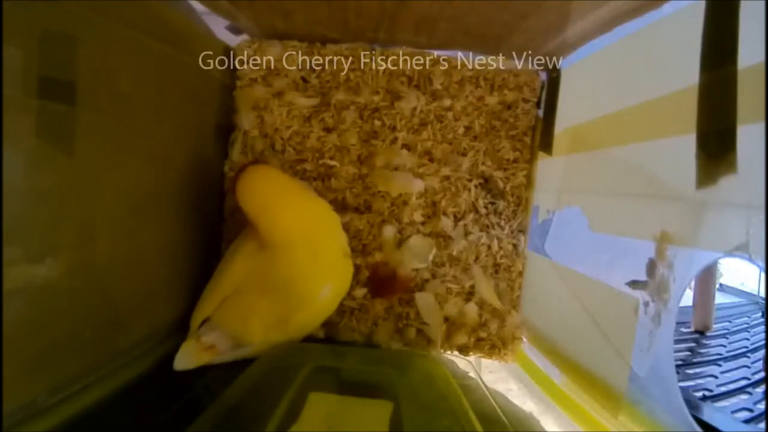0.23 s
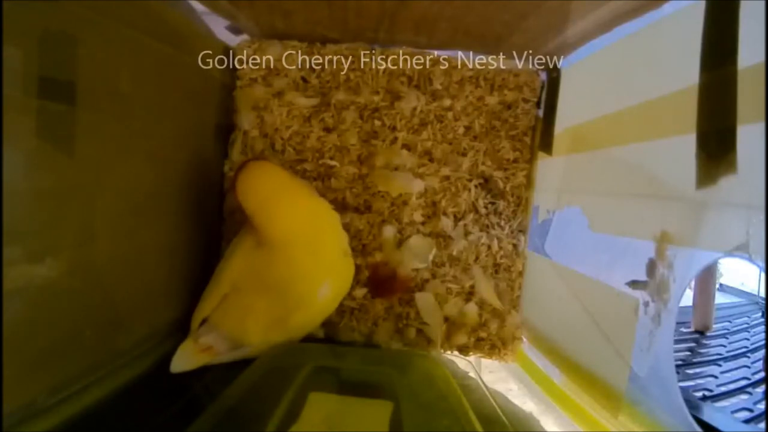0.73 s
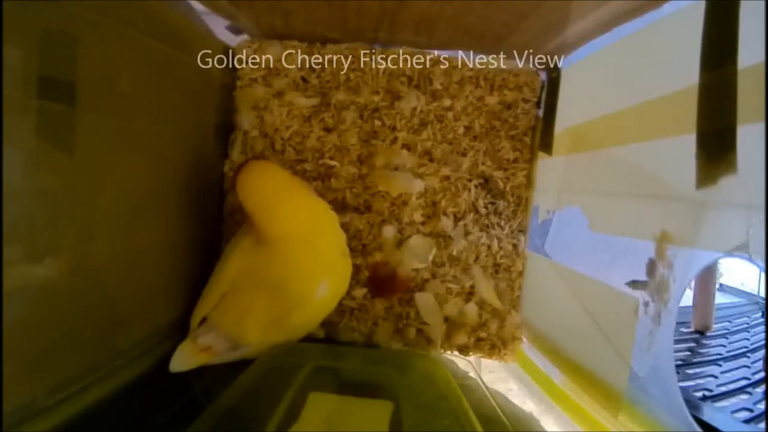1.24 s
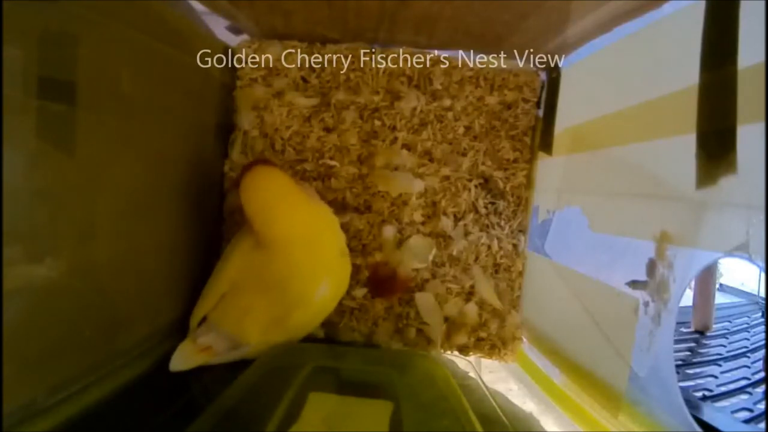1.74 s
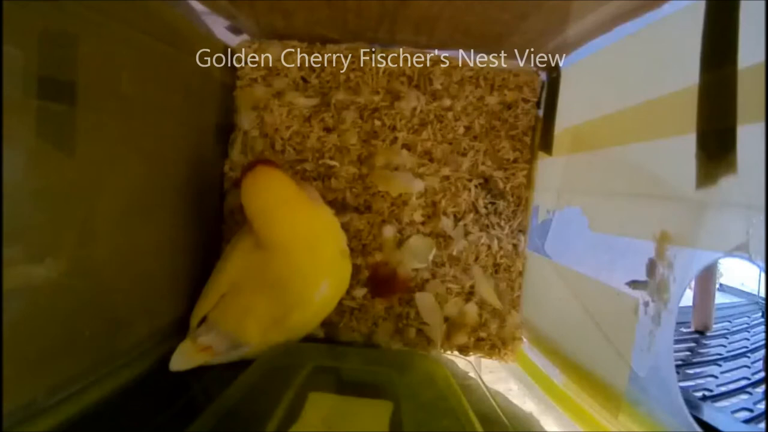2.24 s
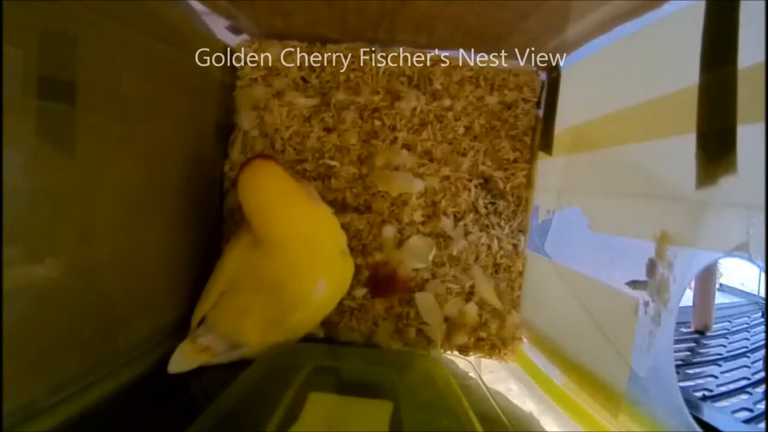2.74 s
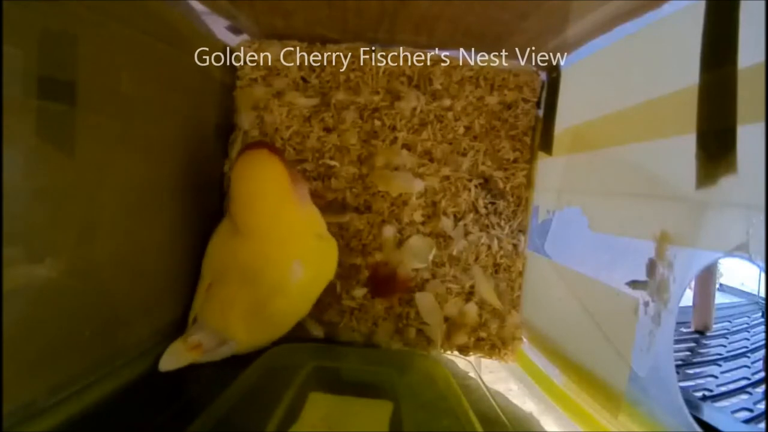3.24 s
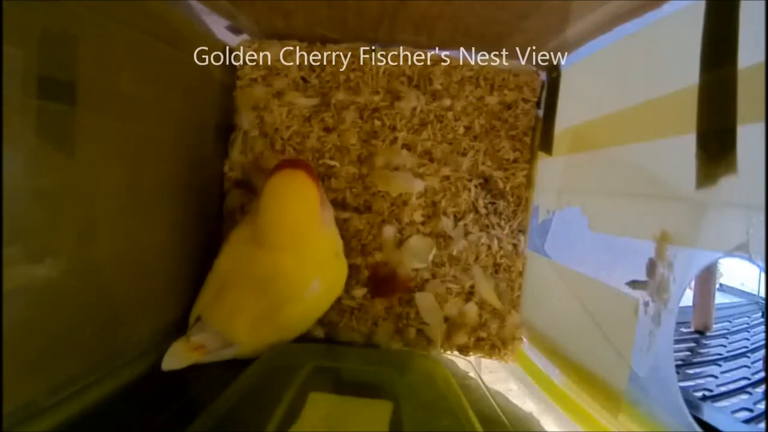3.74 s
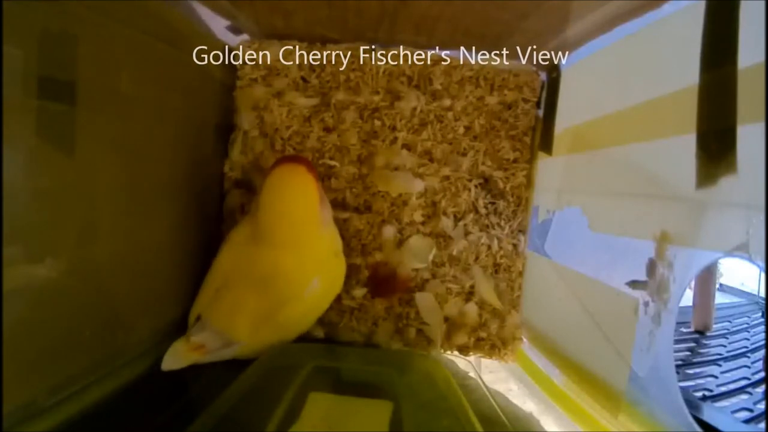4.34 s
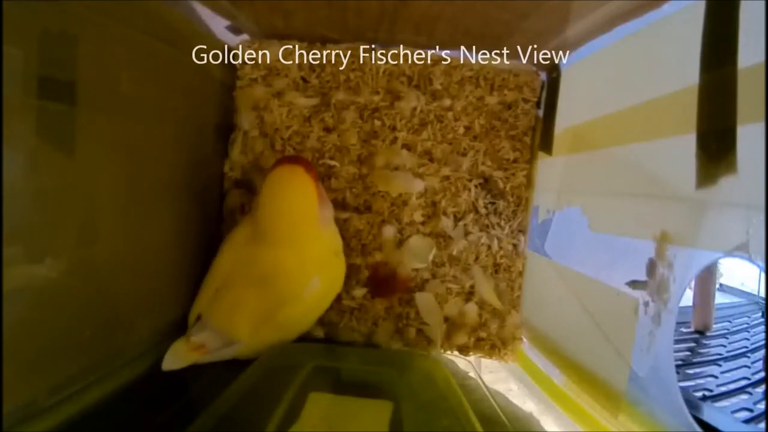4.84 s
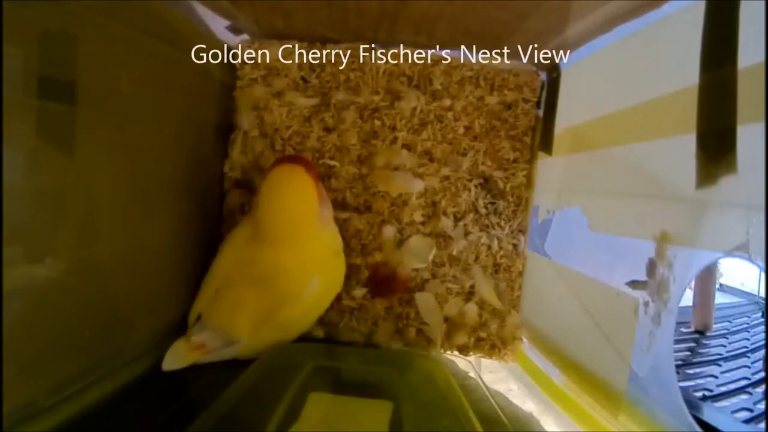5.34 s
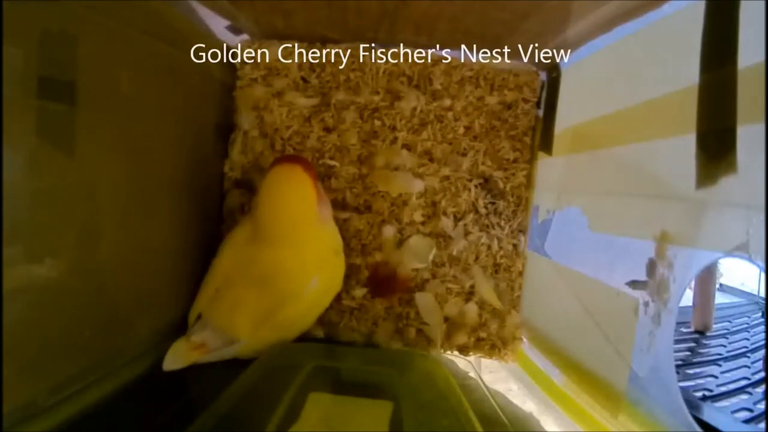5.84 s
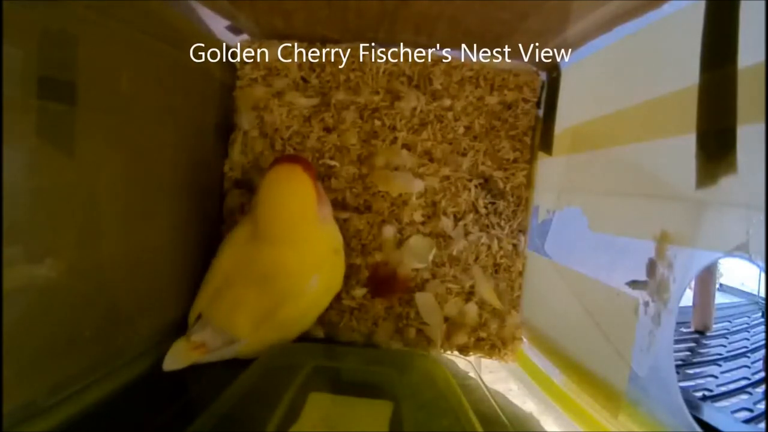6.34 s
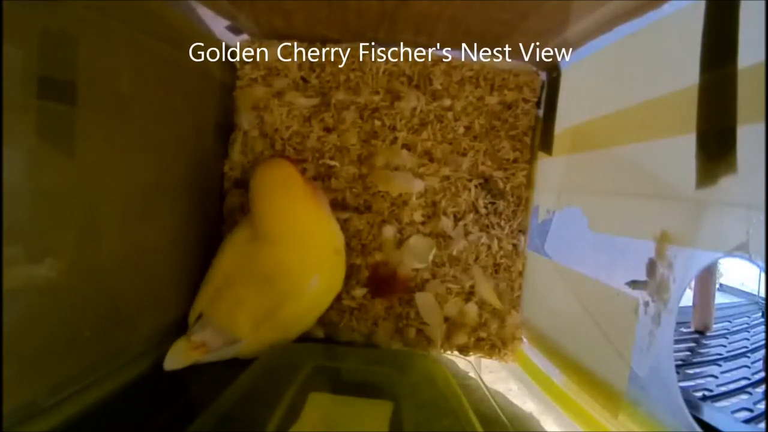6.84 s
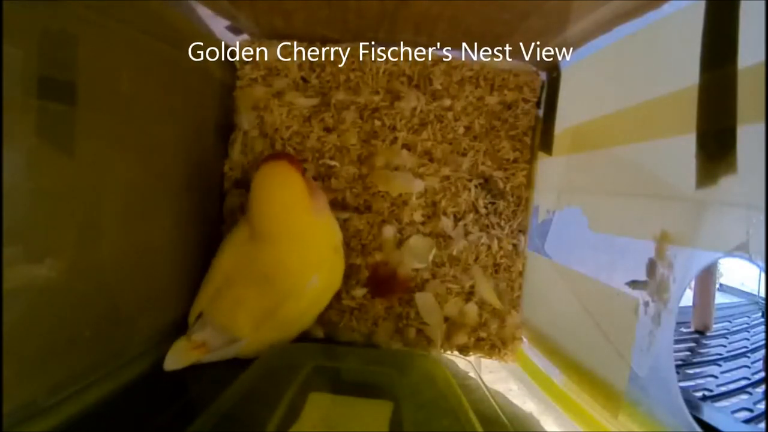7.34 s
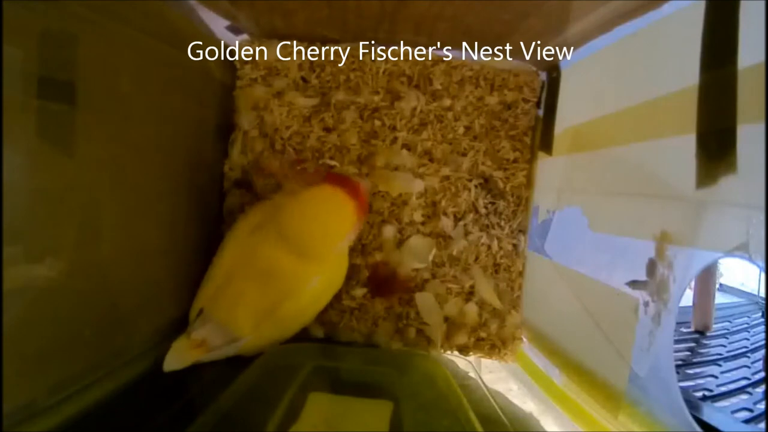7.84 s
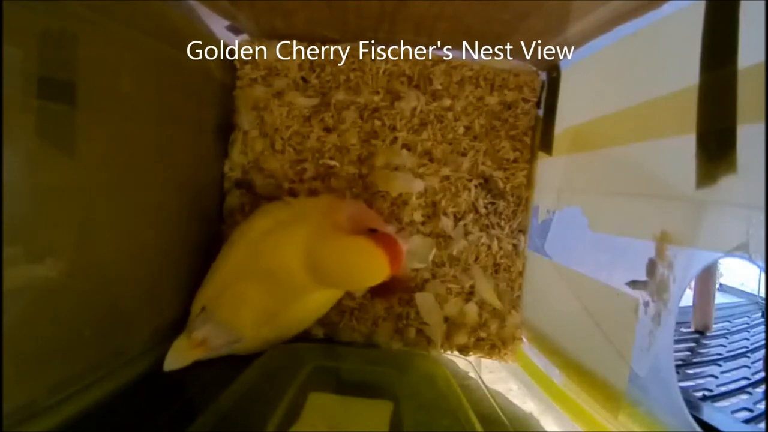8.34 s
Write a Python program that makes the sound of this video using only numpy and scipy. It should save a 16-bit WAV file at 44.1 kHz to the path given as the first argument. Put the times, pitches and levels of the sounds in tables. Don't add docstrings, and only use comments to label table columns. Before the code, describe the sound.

A small bird shuffles in dry wood shavings inside a wooden box, with hollow knocks, light ticks and short raspy beak scrapes over steady hiss.

```python
import sys
import numpy as np
from scipy import signal
from scipy.io import wavfile
from scipy.ndimage import uniform_filter1d

SR = 44100
rng = np.random.default_rng(int(sys.argv[2]) if len(sys.argv) > 2 else 0)


def undo_db(level):
    steps = np.asarray(level, float) / 20
    return 10 ** steps


def dump_mix(stems):
    frames = np.atleast_2d(stems).T
    limited = np.clip(frames, -1, 1)
    pcm = np.round(limited * 32767).astype(np.int16)
    wavfile.write(sys.argv[1], SR, pcm)


N = 378819

# centre_hz, width_hz, level_db
BOOM_MODES = [(277.6, 23.7, -4.5), (406.5, 38, -3.5), (540.7, 64, 4), (647, 66, 2.5)]
BODY_MODES = [(749.6, 50.5, -4.5), (980, 56, -8), (1054, 61, -5), (1188, 26, -5.5), (1299, 100, -8.5),
              (1670, 56, -11), (1963, 230, -17.5)]
SNAP_MODES = [(2480, 150, 4), (2928, 35, 8.7), (3123, 210, 6), (3410, 61, 7)]
CRACK_MODES = [(4360, 350, 0), (5490, 250, -4.5), (5730, 770, -2), (6690, 330, 1.5), (4950, 870, -6.5)]


def evened(x):
    return x / np.sqrt(np.mean(x ** 2) + 1e-20)


def steadied(x):
    slow_power = uniform_filter1d(x ** 2, 450)
    return evened(x / (slow_power + 1e-3 * np.mean(x ** 2)) ** .3)


def add(mix, start_s, sound):
    part = mix[max(round(start_s * SR), 0):][:len(sound)]
    part += sound[:len(part)]


def add_events(mix, source, rows, dice):
    for row, d in zip(rows, dice):
        add(mix, *source(row, d))


def resonate(x, hz, width):
    r = np.exp(-np.pi * width / SR)
    if np.ndim(hz) == 0:
        pole = r * np.exp(2j * np.pi * hz / SR)
        return 2 * signal.lfilter([1 - r], [1, -pole], x).real
    carrier = np.exp(2j * np.pi * np.cumsum(hz) / SR)
    return 2 * (carrier * signal.lfilter([1 - r], [1, -r], x / carrier)).real


def ring(x, modes):
    return sum(undo_db(db) * resonate(resonate(x, hz, width), hz, 4 * width) for hz, width, db in modes)


def crackle(size, per_s, spread_db, dice):
    when, sign, big = dice.random((3, size))
    size_db = -spread_db * np.log(np.maximum(big, .02))
    return (when < per_s / SR) * np.sign(sign - .5) * undo_db(size_db)


def hiss():
    # frequency_hz, density_db
    hiss_curve = [(35, -44), (60, -15.5), (256, 0.5), (1070, -1.5), (2380, -10), (4300, -15), (7700, -14.5),
                  (17500, -120)]
    # frequency_hz, rms_db
    whine_tones = [(5911, -78), (7881.5, -73.5)]
    frames = N // 256 + 5
    a, b, patches = rng.standard_normal((frames, 513, 3)).T
    patches = evened(uniform_filter1d(uniform_filter1d(patches, 10, 0), 8, 1))
    hz = np.fft.rfftfreq(1024, 1 / SR)
    curve_hz, curve_db = np.transpose(hiss_curve)
    shape_db = np.interp(np.log(hz + 1), np.log(curve_hz + 1), curve_db)[:, None]
    z = (a + 1j * b) * undo_db(shape_db + 1.4 * patches)
    out = undo_db(-61.5) * evened(signal.istft(z, nperseg=1024, noverlap=768)[1][:N])
    t = np.arange(N) / SR
    for tone_hz, rms_db in whine_tones:
        waver_db = 1.2 * evened(resonate(rng.standard_normal(N), 0, 24))
        out += np.sqrt(2) * undo_db(rms_db + waver_db) * np.sin(2 * np.pi * tone_hz * t)
    return out


def rumble():
    start_db, settle_s, rest_db, wander_db = 18, 0.46, -99.5, 3
    shake, drone, wander = rng.standard_normal((3, N))
    db = rest_db + start_db * np.exp(-np.arange(N) / SR / settle_s)
    db += wander_db * evened(ring(wander, [(0, 2.3, 0)]))
    shaking = undo_db(db) * evened(ring(shake, [(44.3, 47, 0)]))
    return shaking + undo_db(-84) * evened(ring(drone, [(101.7, 13, 0)]))


def rustle(level_db, bright_db, dice, per_s, clump_db):
    clumps = evened(resonate(dice.standard_normal(len(level_db)), 0, 30))
    snaps = crackle(len(level_db), per_s, 2.1, dice) * undo_db(clump_db * clumps)
    low = evened(ring(snaps, BODY_MODES) + undo_db(-6.0) * ring(snaps, BOOM_MODES))
    high = evened(ring(snaps, SNAP_MODES) + undo_db(-6.0) * ring(snaps, CRACK_MODES))
    return undo_db(level_db) * (low + undo_db(bright_db) * high) * signal.windows.tukey(len(level_db), .05)


def shuffle(dice):
    # time_s, rustle_db
    restlessness = [(0.0, -70.5), (0.12, -62.5), (1.1, -72), (1.79, -59.5), (2.08, -70), (2.63, -76),
                    (3.11, -60), (3.3, -60.5), (3.73, -67.5), (4.57, -76.5), (5.14, -68.5), (5.4, -62.5),
                    (6.29, -74), (6.7, -65), (7.23, -74.5), (7.7, -64.5), (8.11, -79), (8.59, -66)]
    time_s, rustle_db = np.transpose(restlessness)
    t = np.arange(time_s[0], time_s[-1], 1 / SR)
    db = np.interp(t, time_s, rustle_db)
    bright_follows = 0.47
    bright_db = -7 - (1 - bright_follows) * (db - db.mean())
    return rustle(db, bright_db, dice, 1200, 3.5)


def slide(row, dice):
    start_s, length_s, start_db, fall_db, bright_db = row
    u = np.arange(0, length_s, 1 / SR) / length_s
    return start_s, rustle(start_db - fall_db * u, bright_db, dice, 1800, 2.5)


def slides(mix, dice):
    # start_s, length_s, start_db, fall_db, bright_db
    slide_rows = [
        (1.379, 0.055, -38, 21.5, -9.5),
        (1.437, 0.036, -50, 6, -1),
        (1.485, 0.116, -46.5, 30, -17.5),
        (2.67, 0.11, -48.5, 24, -16.5),
        (2.992, 0.045, -27, 19, -10),
        (3.034, 0.06, -43, 2.5, -6),
        (3.086, 0.08, -43, 7.5, -5),
        (3.153, 0.06, -50, 15, -10),
    ]
    add_events(mix, slide, slide_rows, dice)


def peck(row, dice):
    start_s, peak_db, hz, length_s = row
    t = np.arange(round(.15 * SR)) / SR
    shape = (1 - np.exp(-t / 0.001)) * np.exp(-(t / max(length_s, .004)) ** 2)
    tremble = evened(resonate(dice.standard_normal(len(t)), 0, 120)) * min(hz / 400, 1)
    phase = 2 * np.pi * hz * t + .6 * max(hz / 1000, 1) * tremble
    return start_s, undo_db(peak_db - 1.5 + 3.2 * tremble) * shape * np.sin(phase)


def pecks(mix, dice):
    # start_s, peak_db, pitch_hz, length_s
    panel_pecks = [(0.042, -49.5, 1108, 0.023), (0.065, -51, 650, 0.032), (0.132, -59, 1143, 0.033),
                   (0.182, -46, 626, 0.018), (0.571, -48.5, 644, 0.017), (0.747, -51, 632, 0.018),
                   (0.797, -50, 640, 0.025), (0.86, -46.5, 528, 0.015), (2.653, -27, 1140, 0.0085),
                   (2.962, -25.5, 1067, 0.014), (3.275, -45, 465, 0.02), (5.139, -44.5, 818, 0.021),
                   (5.228, -38, 436, 0.0062), (5.346, -43, 336, 0.008), (5.925, -52.5, 1477, 0.012),
                   (7.042, -54, 1320, 0.014), (7.215, -50, 1330, 0.01), (7.469, -64, 605, 0.016),
                   (8.019, -57, 293, 0.041), (8.437, -52.5, 422, 0.027), (8.482, -51.5, 458, 0.015),
                   (0.833, -46.5, 526, 0.018), (1.352, -31.5, 778, 0.035), (3.669, -47.5, 1595, 0.025),
                   (3.673, -47.5, 680, 0.026), (5.82, -46.5, 1510, 0.019)]
    # start_s, peak_db, pitch_hz, length_s
    clink_rows = [
        (0.105, -59, 1670, 0.017),
        (5.3143, -62.5, 4230, 0.023),
        (5.663, -50, 1930, 0.012),
        (5.9063, -52.5, 2260, 0.015),
        (6.0634, -56.5, 2000, 0.013),
        (6.1674, -58, 2130, 0.029),
        (8.04, -58, 4150, 0.028),
        (8.0886, -69, 4210, 0.015),
        (8.144, -62.5, 4320, 0.033),
        (8.317, -66, 3330, 0.012),
    ]
    # start_s, peak_db, pitch_hz
    thump_rows = [
        (0.418, -87, 47),
        (1.177, -66.5, 81),
        (1.337, -65, 140),
        (2.647, -68, 108),
        (2.958, -51, 58.6),
        (3.668, -67, 66.5),
        (5.14, -76, 136.4),
        (5.698, -60.5, 140),
        (8.028, -63, 79.5),
    ]
    thumps = [(*row, .03) for row in thump_rows]
    add_events(mix, peck, [*panel_pecks, *clink_rows, *thumps], dice)


def knock(row, dice):
    start_s, peak_db, boom_db, snap_db, length_s, crack_db = row
    t = np.arange(round(.2 * SR)) / SR
    force = np.exp(-(t / max(length_s, .004)) ** 2) + 0.2 * np.exp(-t / 0.069)
    blows = crackle(len(t), 3000, 1.5, dice) * force
    blows[0] = 4.6
    groups = [(0, BODY_MODES), (boom_db, BOOM_MODES), (snap_db, SNAP_MODES), (snap_db + crack_db, CRACK_MODES)]
    sound = np.zeros(len(t))
    for db, modes in groups:
        rung = ring(blows, modes)
        short_peak = np.sqrt(uniform_filter1d(rung ** 2, 350).max())
        sound += undo_db(db) * rung / short_peak
    return start_s - .002, undo_db(peak_db - 11) * sound


def knocks(mix, dice):
    # start_s, peak_db, boom_db, snap_db, length_s
    foot_knocks = [(0.994, -33.5, -1.5, -10.5, 0.028), (1.18, -26, -2, -14, 0.023),
                   (1.351, -21, -6.5, -11.5, 0.018), (1.361, -30, 8.5, -10.5, 0.014),
                   (1.481, -26, -18, -18.5, 0.018), (1.508, -33, -25, -9.5, 0.02),
                   (1.722, -33, 1, -18, 0.012), (2.65, -33, -3.5, 2, 0.012), (2.699, -38, -23, -13, 0.011),
                   (2.957, -18, -15, -26, 0.018), (2.973, -18, 1.5, -5.5, 0.013),
                   (3.668, -38.5, -13, 0.5, 0.011)]
    claw_knocks = [(0.111, -52.5, -6, -12.5, 0.02), (2.168, -56, -23, -2, 0.027),
                   (2.316, -48.5, -6, -5.5, 0.048), (2.372, -44.5, -1, -11, 0.011),
                   (2.963, -10, -3, -11, 0.022), (3.951, -42.5, -3, -14.5, 0.016),
                   (5.136, -41.5, -8, -17.5, 0.033), (5.22, -41.5, -2, -7.5, 0.019),
                   (5.462, -41, -13.5, -6, 0.015), (5.819, -36.5, -5.5, -3.5, 0.02),
                   (5.975, -38, -14, -3.5, 0.021)]
    chip_knocks = [(0.833, -43.5, -2, -29.5, 0.037), (1.039, -50, 10, -25, 0.015),
                   (1.439, -57, -15, -15, 0.028), (1.546, -37.5, -6, -25, 0.013),
                   (2.928, -46, 1, -9.5, 0.035), (3.273, -41, -17.5, -15.5, 0.0091),
                   (5.33, -43.5, -7, -17.5, 0.022), (5.674, -47.5, 2, -29, 0.012),
                   (6.004, -53.5, -15, -4, 0.016), (6.878, -44.5, -12, -17.5, 0.0072),
                   (7.136, -49.5, -15, -13.5, 0.058), (7.401, -52, -11, -0.5, 0.011),
                   (8.025, -47, -1, -9.5, 0.042), (8.433, -55, 9, -11, 0.012), (8.483, -58, -2, -9, 0.024)]
    kinds = (foot_knocks, -16), (claw_knocks, -1.5), (chip_knocks, 6.5)
    rows = sorted((*row, crack_db) for rows, crack_db in kinds for row in rows)
    add_events(mix, knock, rows, dice)


def varied(slips, modes, travel, spread_db, dice):
    wander = [evened(resonate(dice.standard_normal(len(slips)), 0, 4.1)) for _ in modes]
    return sum(ring(slips * undo_db(spread_db * w), [(hz * travel, width, db)])
               for w, (hz, width, db) in zip(wander, modes))


def stroke(row, dice):
    # centre_hz, width_hz, level_db
    second_ring = [(1759, 68, 0)]
    grit_rings = [(2372, 85, -2), (2695, 99, 2), (3128, 190, 4.5), (3373, 40, 8.5), (3660, 270, -11),
                  (4260, 330, -10), (5230, 190, -13.5), (6360, 330, -18), (2910, 790, -10.5),
                  (4830, 1200, -19.5)]
    start_s, length_s, top_db, top_hz, top_grit_db, bite_db, bite_grit_db, bite_second_db, from_hz, to_hz, sag = row
    u = np.arange(0, length_s, 1 / SR) / length_s
    bite, top, hold, drop = .15, .45, 0.63, 0.77
    press_db = top_db + np.interp(u, [0, bite, top, hold, drop, 1], [-28.5, bite_db, 0, -3, -11, -17])
    hz = top_hz * np.interp(u, [0, top, hold, 1], [1, 1, 0.93, 0.97]) ** sag
    second_db = np.interp(u, [0.2, hold, 1], [bite_second_db, -17.5, -9.5]) - 8 * (1 - sag)
    grit_db = top_grit_db + np.interp(u, [bite, top, 1], [bite_grit_db, 0, 2.5])
    lower_db = np.interp(u, [top, drop], [-8, 0]) - 14 * (1 - sag)
    grit_hz = from_hz + (to_hz - from_hz) * u
    slips = crackle(len(u), 2500, 1.1, dice)
    main = ring(slips, [(hz, 70, 0), (hz * 0.853, 60, lower_db)])
    travel = (grit_hz / 3350) ** .35
    grit = varied(slips, grit_rings, travel, 4.5, dice) + ring(slips, [(grit_hz, 110, 3)])
    sound = steadied(main) + undo_db(second_db) * evened(ring(slips, second_ring)) + undo_db(grit_db) * steadied(grit)
    return start_s, undo_db(press_db) * sound * signal.windows.tukey(len(u), .15)


def strokes(mix, dice):
    # start_s, length_s, pressure_db, main_ring_hz, grit_db
    tip_strokes = [
        (0.384, 0.13, -44.5, 1288, -7.5),
        (1.777, 0.11, -44, 1304, -2),
        (1.97, 0.11, -43.5, 1265, -4.5),
        (6.741, 0.125, -45, 1280, -4),
        (7.5, 0.094, -47.5, 1300, -4),
    ]
    side_strokes = [
        (1.85, 0.07, -44, 1290, -7),
        (5.46, 0.09, -47, 1290, -4.5),
        (6.38, 0.11, -47.5, 1263, -6.5),
        (6.54, 0.1, -45, 1289, -5.5),
        (7.655, 0.1, -43.5, 1268, -7.5),
    ]
    rim_strokes = [
        (4.8, 0.062, -47, 1300, -11.5),
        (4.858, 0.055, -46, 1260, -15),
        (7.85, 0.115, -43.5, 1274, -10),
    ]
    # bite_db, bite_grit_db, bite_second_db, grit_from_hz, grit_to_hz, sag (exponent)
    tip_contact = (-8.5, 11.5, 1, 3686.5, 3149, 1.14)
    side_contact = (-5, 4.5, -9.5, 3163, 3233, 1.19)
    rim_contact = (-8, 12.5, -10, 3609, 3466, 0.53)
    parts = (tip_strokes, tip_contact), (side_strokes, side_contact), (rim_strokes, rim_contact)
    rows = sorted((*row, *contact) for rows, contact in parts for row in rows)
    add_events(mix, stroke, rows, dice)


def scene():
    mix = np.zeros(N)
    dice = rng.spawn(200)
    add(mix, 0, shuffle(dice[0]))
    slides(mix, dice[1:])
    pecks(mix, dice[100:])
    knocks(mix, dice[40:])
    strokes(mix, dice[10:])
    port = signal.butter(8, 7400, fs=SR, output="sos")
    mix = signal.sosfilt(port, mix) + hiss()
    return (mix + rumble())[None]


def starve(x, hop, spare_db):
    bins = round(hop * 16000 / SR)
    n, k = np.arange(2 * hop) + .5, np.arange(bins) + .5
    window = np.sin(np.pi * n / (2 * hop))[:, None]
    basis = window * np.cos(np.pi / hop * np.outer(n + hop / 2, k)) * np.sqrt(2 / hop)
    frames = np.lib.stride_tricks.sliding_window_view(np.pad(x, (hop, 2 * hop)), 2 * hop)[::hop]
    c = frames @ basis
    hz = k * SR / (2 * hop)
    busy = np.mean(np.log(abs(c) + 1e-9), 1, keepdims=True)
    busy = np.exp(.75 * busy + .25 * np.median(busy))
    band = (np.sqrt(hz / 8000) * 24).astype(int)
    share_db = 1.5 * rng.standard_normal((len(c), 24))[:, band]
    coarse_db = np.interp(hz, [0, 1500, 2600, 4000, 7200, 7600], [-12, 2, 10, 9, 9.5, 11.5])
    step = busy * undo_db(coarse_db + share_db - spare_db)
    c = np.sign(c) * step * np.floor((abs(c) / step) ** .75 + .405) ** (4 / 3)
    halves = (c @ basis.T).reshape(-1, 2, hop)
    return (halves[1:, 0] + halves[:-1, 1]).ravel()[:len(x)]


def band_limit(x):
    return signal.sosfilt(signal.butter(12, 8540, fs=SR, output="sos"), x)


def record(dry):
    power_db = 10 * np.log10(uniform_filter1d(dry[0] ** 2, 256) + 1e-12)
    attack = power_db - np.roll(power_db, 512) > 14
    near_attack = uniform_filter1d(attack * 1., 1300) > 1e-3
    short = uniform_filter1d(1. * near_attack, 300)
    rounded = (1 - short) * starve(dry[0], 1100, 0) + short * starve(dry[0], 300, 5)
    return band_limit(.4 * np.tanh(rounded[None] / 0.42))


dry = scene()
out = record(dry)
dump_mix(out)
```